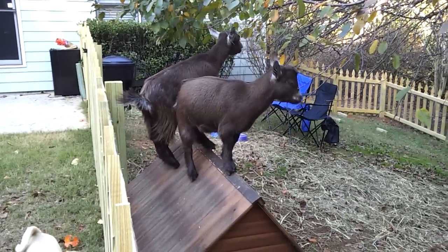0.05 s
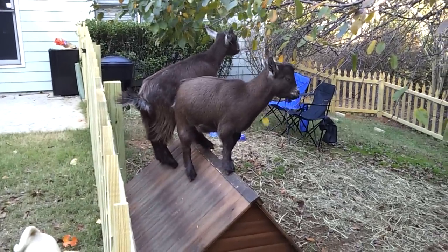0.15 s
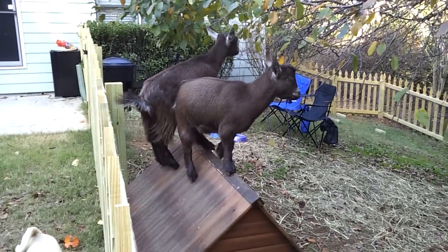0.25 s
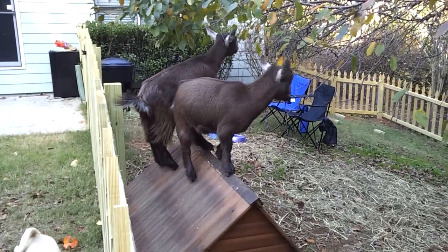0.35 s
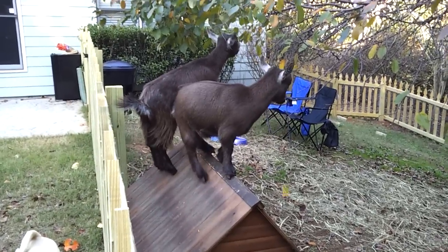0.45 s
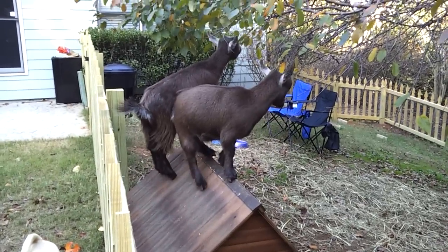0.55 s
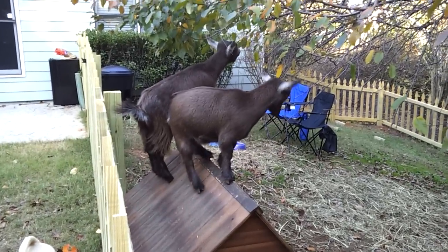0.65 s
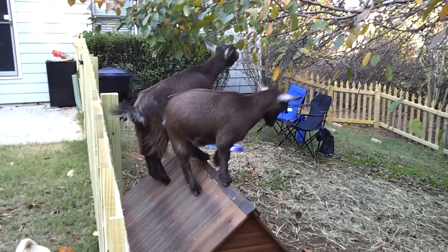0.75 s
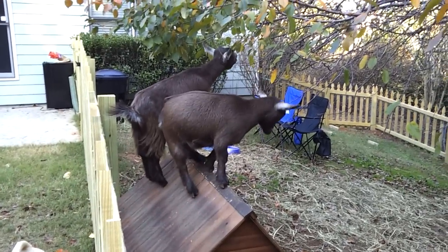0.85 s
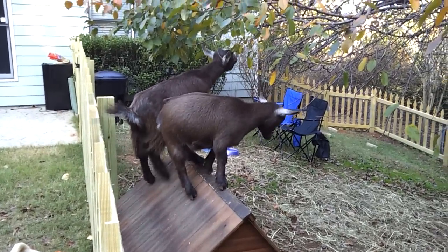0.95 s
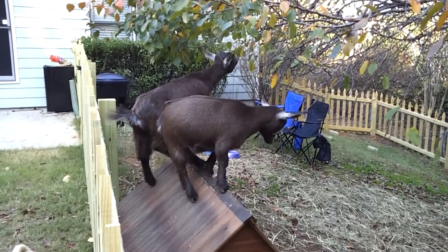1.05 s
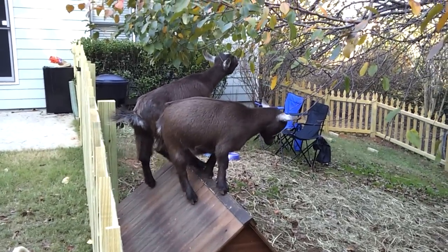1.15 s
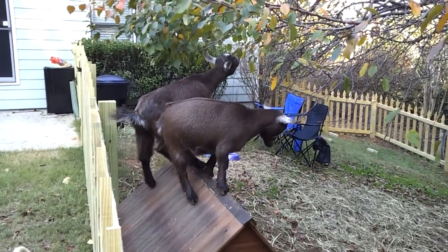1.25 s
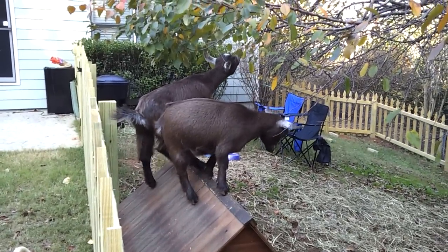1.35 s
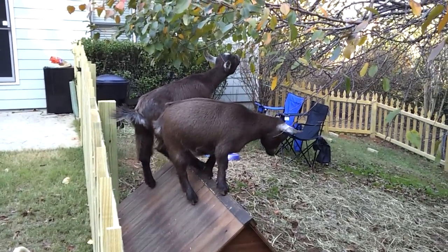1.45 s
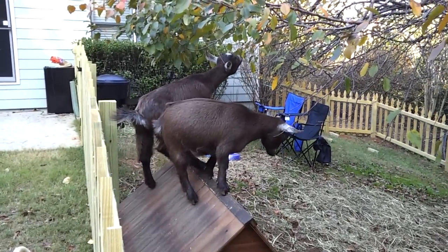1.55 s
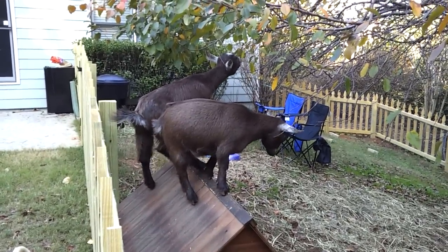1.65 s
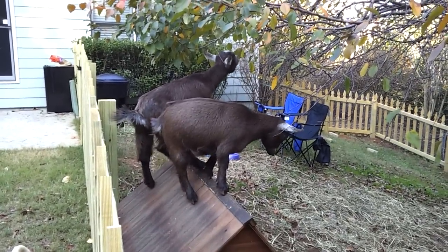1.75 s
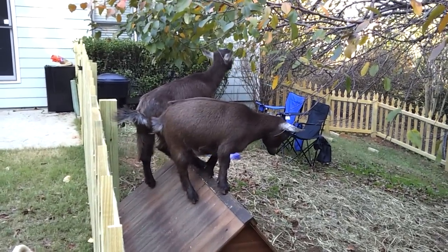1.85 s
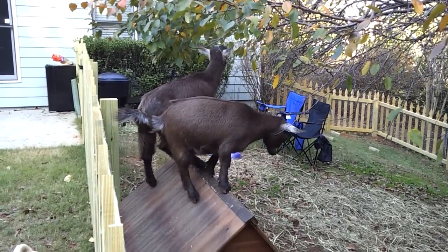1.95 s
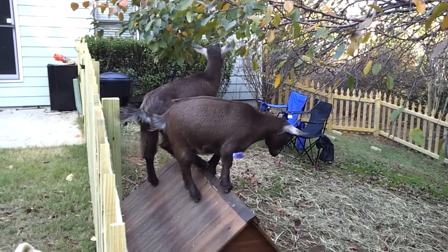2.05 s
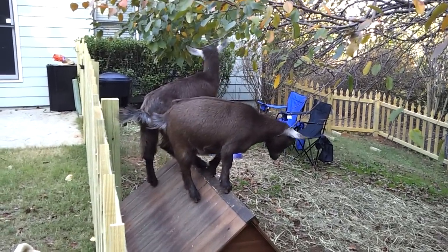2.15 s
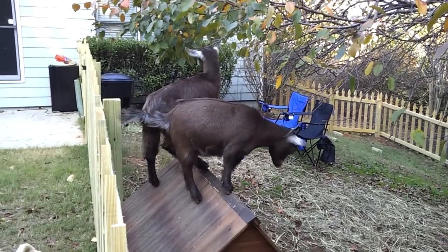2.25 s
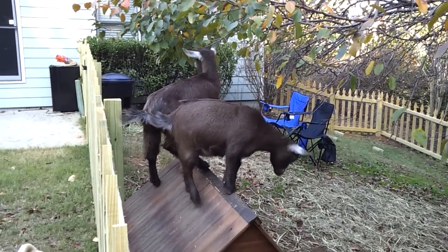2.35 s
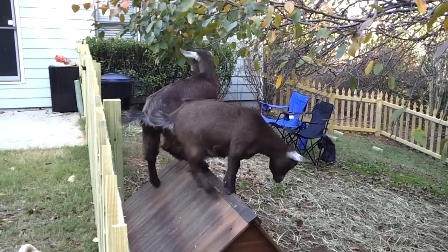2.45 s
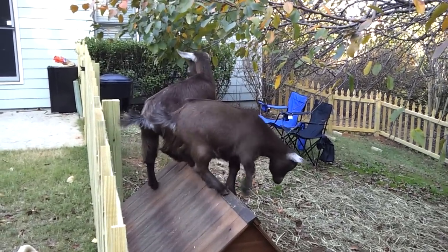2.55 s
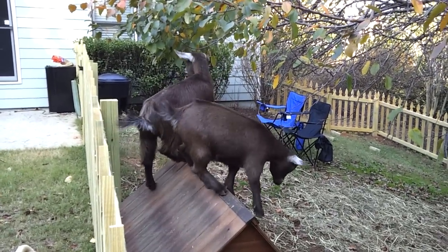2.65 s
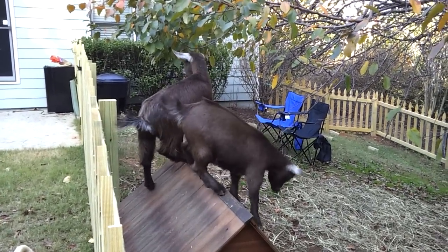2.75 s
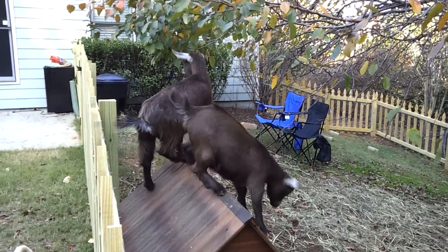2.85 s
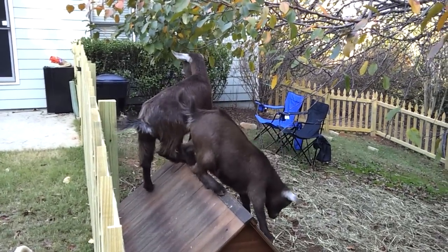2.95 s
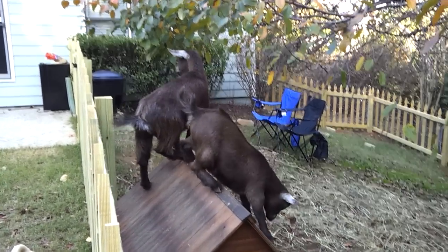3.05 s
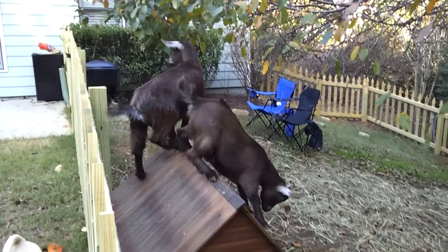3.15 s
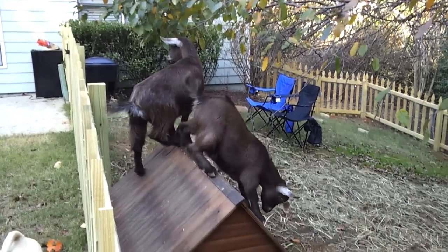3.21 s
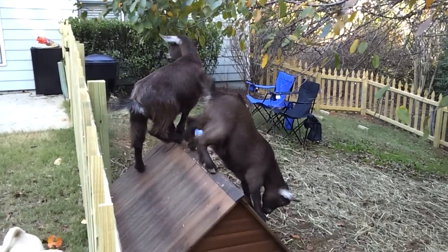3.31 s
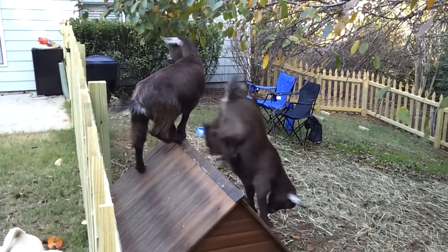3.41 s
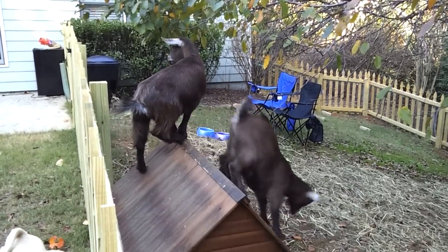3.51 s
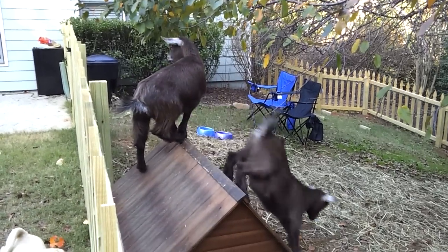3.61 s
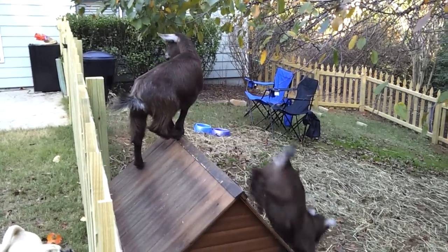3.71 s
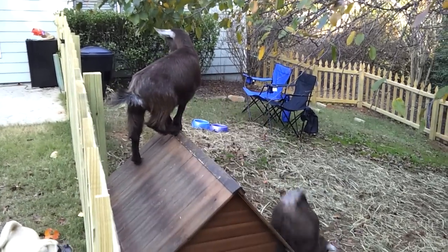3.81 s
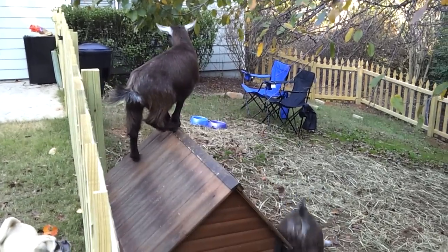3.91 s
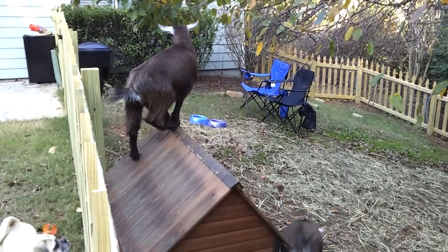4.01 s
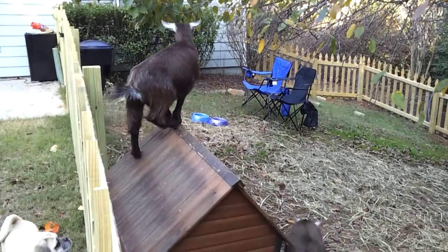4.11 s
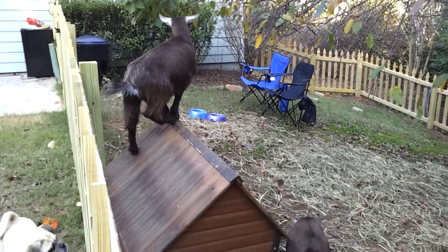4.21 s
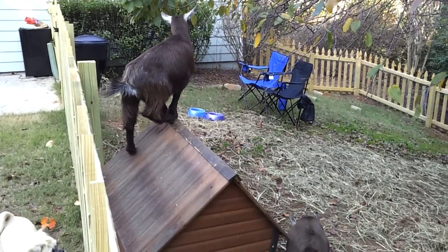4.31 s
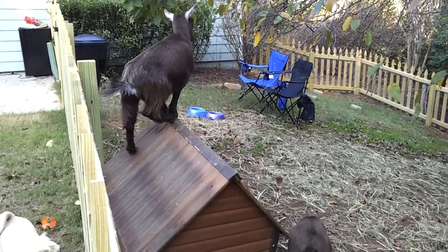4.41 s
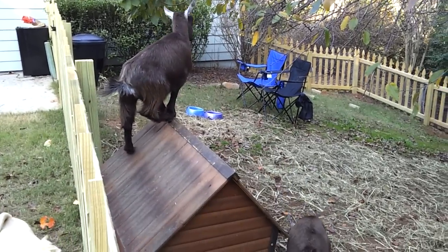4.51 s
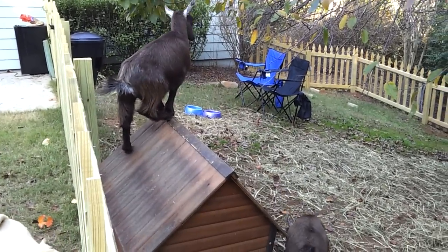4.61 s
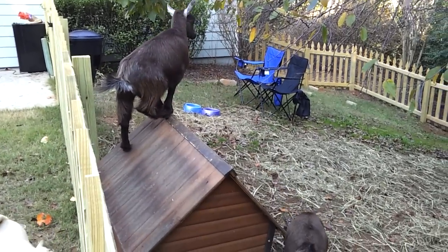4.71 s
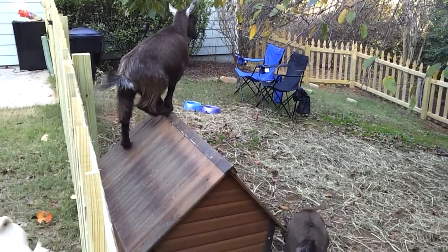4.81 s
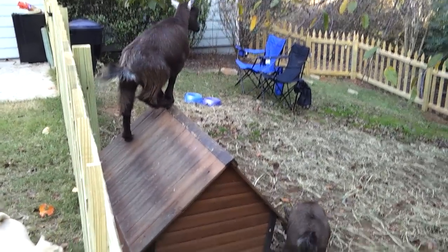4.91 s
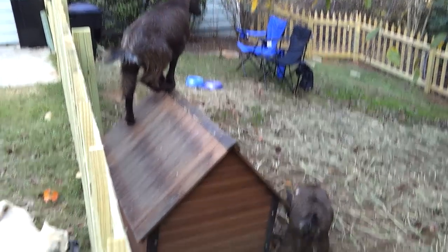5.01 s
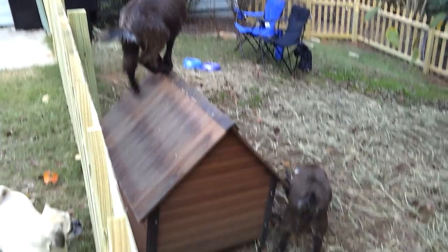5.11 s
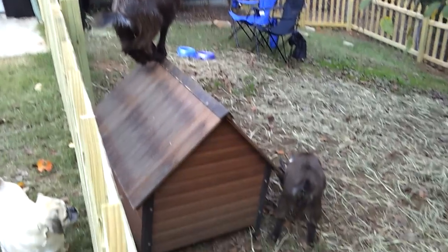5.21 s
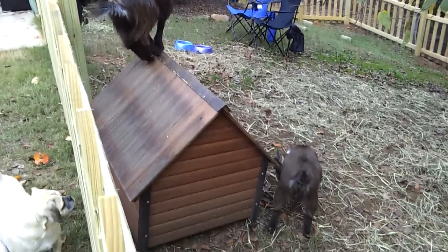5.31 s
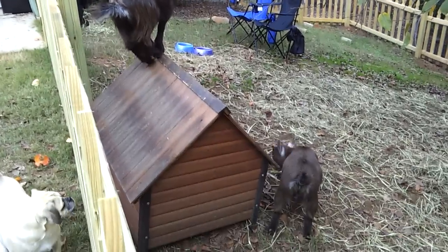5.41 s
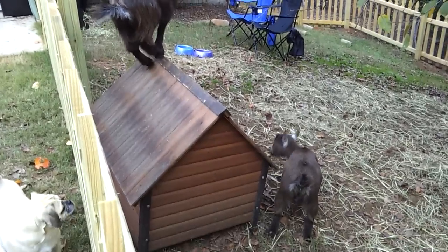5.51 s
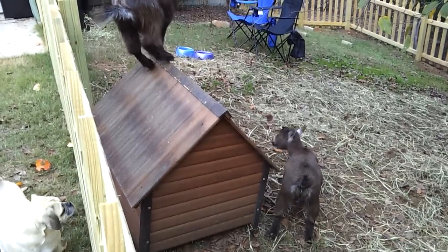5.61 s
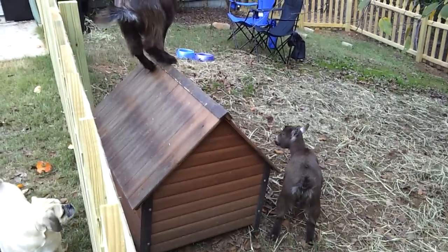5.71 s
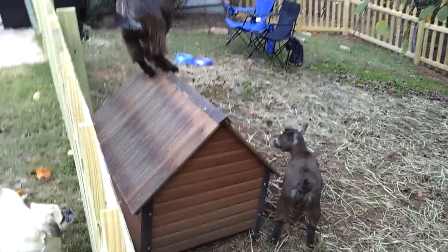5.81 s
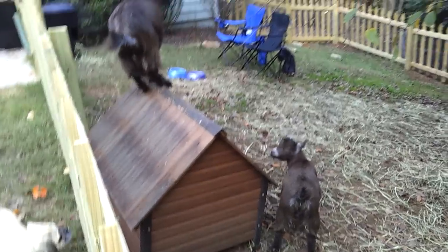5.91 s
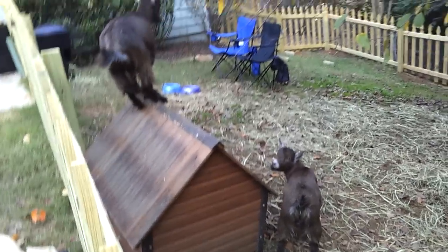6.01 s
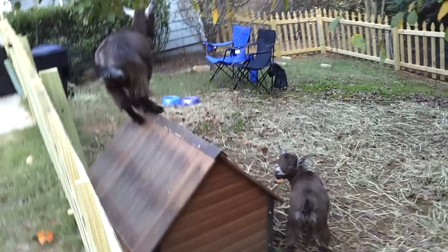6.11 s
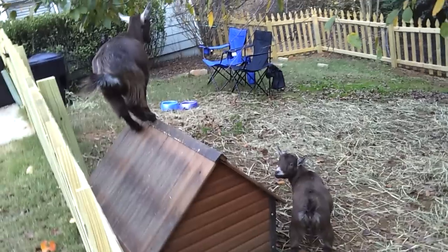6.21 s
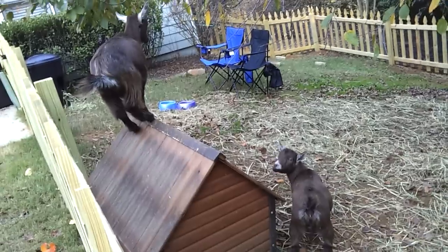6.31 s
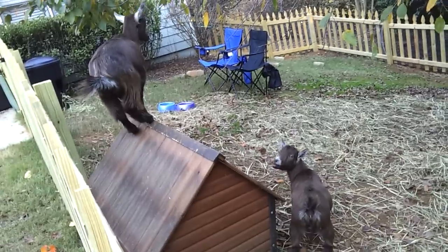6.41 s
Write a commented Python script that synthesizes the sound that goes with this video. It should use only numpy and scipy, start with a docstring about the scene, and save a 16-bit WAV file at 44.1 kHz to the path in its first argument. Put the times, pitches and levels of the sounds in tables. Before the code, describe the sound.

Close to the microphone, goats shift on a wooden doghouse roof with light hoof knocks and scuffs. Midway, a louder knock starts a juddering, rasping slide down the boards, ending in several hollow thumps and a crackle of dry straw. A few faint scuffs and taps follow. Farther off, crickets trill throughout over soft garden air and the low drone of a distant engine.

```python
"""A cricket trills in a garden and, close in front of the microphone, hooves scuff and knock on wood.
Two goats shift about on a doghouse roof; one slides down the boards, kicks off and lands in straw.
Each blow booms the hollow box, knocks the roof boards and cracks on the surface; slipping hooves
judder and rasp. Farther off, crickets sing in the hedges over quiet air and a distant engine's drone."""
import sys
import numpy as np
from scipy import signal
from scipy.fft import rfft, irfft
from scipy.io import wavfile
from scipy.ndimage import uniform_filter1d

SR = 44100
rng = np.random.default_rng(int(sys.argv[2]) if len(sys.argv) > 2 else 0)


def wrap_up_sound(samples):
    """Save the sound to the file named by the first command line argument, as 16-bit audio."""
    columns = np.atleast_2d(samples).T
    # keep every value between -1 and 1, then stretch to whole-number steps
    tamed = np.clip(columns, -1, 1)
    steps = np.round(tamed * 32767).astype(np.int16)
    wavfile.write(sys.argv[1], SR, steps)


N = 284886

# hoof blows: t/s, knock level/dB, thump over knock/dB, hardness/0-1, box pitch the spot favours/Hz
BLOWS = [(.277, -46.5, -8, .9, 110), (.456, -52, 17, 0.7, 106), (.501, -55, 18.5, .05, 124),
         (.537, -51.5, 14.5, 0, 139), (.572, -53, 12, 0.8, 153), (.825, -42.5, 2, 0.6, 130),
         (1.086, -50, -12, 0.8, 141), (1.129, -41.5, -7, 0.93, 109), (2.195, -48.5, -3, 0.76, 135),
         (2.309, -48, 22.5, .25, 99), (2.377, -32.5, 6.5, 0.16, 160), (2.395, -35, 1, 0.2, 130),
         (2.430, -51.5, 18.5, 0.2, 121), (2.541, -45, 5, 0.67, 150), (2.562, -39, -18, .68, 150),
         (2.687, -45.5, 12, 0.2, 154), (2.730, -22.5, 0, 0.2, 210), (2.770, -33, -14, .03, 195),
         (2.842, -45, 9, .03, 110), (2.877, -55.5, 22, .03, 133), (3.527, -28, 10, .25, 108),
         (3.544, -29, 13.5, 0.91, 110), (3.582, -41, 1, .75, 165), (3.771, -41, 8, 0.8, 140),
         (3.786, -30.5, 19, .48, 130), (3.808, -26, 12.5, 0.58, 134), (5.332, -45, 10, 1, 89.5),
         (5.636, -40, -5, 0.62, 167), (5.654, -48, 5.5, .05, 167), (5.787, -48, -12.5, 0.97, 135)]
# modes of the hollow box: f/Hz, level/dB, t60/s
BOX_MODES = [(57.7, 15, 0.32), (69, 11.5, 0.31), (96.7, 10, 0.13), (110.6, 6, 0.25), (135.4, 12, 0.13),
             (153, -5.5, 0.29), (172.3, 2, 0.17), (197.3, 2, 0.22)]
# modes of the roof boards: f/Hz, level/dB, t60/s
BOARD_MODES = [(240.4, -10.5, 0.14), (291.7, 5.5, 0.055), (317, 4.5, 0.06), (353.5, 0, 0.096),
               (384, -14, 0.17), (424.5, 5.5, 0.039), (465, 1.5, 0.066), (522.6, -0.5, 0.081),
               (573, -6, 0.056)]
# bright ringing of single planks: f/Hz, level/dB, t60/s
PLANK_MODES = [(950, -3, 0.095), (1157, 0, 0.042), (1291, 3, 0.067), (1401, -0.5, 0.059), (1543, 3, 0.043),
               (2320, 0, 0.035), (2374, 5, 0.028), (2597, 6, 0.036), (2870, -1.5, 0.025)]
# dense upper modes of the planks: f/Hz, level/dB
CRACK_SPECTRUM = [(450, 14.5), (600, 1), (780, 2.5), (950, 10), (1100, 6), (1400, -24), (1700, 9),
                  (2050, -10.5), (2400, -2), (2950, 6), (3400, -5), (6000, -7.5), (12000, 2.5)]
# the long slide down the roof, stalling and then gathering speed: t/s, judder level/dB, rasp level/dB
SLIDE = [(2.73, -58, -49), (2.97, -46, -52), (3.07, -48, -59), (3.5, -40, -49), (3.61, -46, -49.5),
         (3.68, -45.5, -67), (3.8, -41, -47)]
# horn rubbing on wood: f/Hz, level/dB
RASP_SPECTRUM = [(400, -2), (750, -11), (930, 0.5), (1100, -11), (1400, 6), (1950, -1), (2400, 1.5),
                 (3200, -0.5), (4700, -4), (5600, -9), (6800, -5), (10200, -10.5), (12000, -15)]
# short scuffs of a hoof: t/s, length/s, level/dB
SCUFFS = [(.13, 0.18, -58), (.43, 0.24, -52), (.76, 0.091, -50.5), (1.22, 0.056, -51.5), (1.38, 0.053, -56),
          (3.27, 0.041, -48.5), (4.29, 0.15, -53.5), (4.97, 0.25, -54), (6.21, 0.1, -49.5)]
# a hoof scuffing across the grain: f/Hz, level/dB
SCUFF_SPECTRUM = [(300, 1), (600, -5.5), (1100, -10), (1600, -4), (2100, -4.5), (2600, -1.5), (3300, -16),
                  (5000, -13.5), (7000, -17), (12000, -43)]
# hollow scrapes at the eaves: t/s, length/s, level/dB
EAVE_SCRAPES = [(3.40, 0.084, -48), (3.47, 0.24, -49), (3.55, 0.15, -54), (3.66, 0.13, -47)]
# rustles in the straw: t/s, length/s, level/dB
RUSTLES = [(.5, 0.1, -57), (2.52, 0.079, -53), (3.773, 0.048, -42.5), (3.92, 0.039, -54),
           (3.98, 0.11, -45.5), (4.012, 0.099, -40.5), (4.14, 0.042, -53.5), (4.248, 0.03, -49.5),
           (4.99, 0.078, -54), (5.86, 0.15, -58)]
# dry straw: f/Hz, level/dB
STRAW_SPECTRUM = [(800, -9), (2200, -8.5), (3200, -3.5), (5500, -4), (6700, 2), (7500, 4), (8600, -1),
                  (9900, 3.5), (11000, -3.5), (12000, -3.5)]
# snapping stalks and grit: t/s, level/dB, brightest f/Hz
SNAPS = [(1.804, -54, 8300), (1.902, -58, 8000), (1.948, -53.5, 7540), (2.317, -46, 3600),
         (2.634, -55, 5560), (3.355, -44, 3800), (3.409, -50, 3170), (3.788, -40.5, 7220),
         (3.818, -43.5, 3500), (4.276, -51, 4886)]
# each cricket's voice, by name: f/Hz, level/dB, wing stroke rate/Hz, trill length/s
CRICKET_VOICES = {"near": (3855, -48.5, 34, .41), "shrill": (4070, -55.5, 33, .38),
                  "slow": (3977, -58.5, 26, .46), "long": (3787, -55.5, 33, .6),
                  "middle": (3640, -55.5, 31.5, .52), "low": (3530, -57.5, 31, .45),
                  "lowest": (3326, -57.5, 30, .47)}
# starts of each cricket's trills, by name: t/s
TRILL_STARTS = {"near": [-.04, 2.725], "shrill": [.8, 3.56, 5.69], "slow": [.57, 1.24, 4.4], "long": [-.3,
                1.42, 3.16, 4.98, 5.72], "middle": [.72, 4.55, 5.58], "low": [.69, 2.24, 4.03], "lowest":
                [1.72, 5.55]}
# the far chorus in the hedges: t/s, level/dB
CHORUS = [(0, -52), (.45, -63), (1.1, -56.5), (4.2, -58.5), (6.46, -55.5)]
# the distant engine: t/s, firing rate/Hz, level/dB
ENGINE = [(0, 74.4, -50.5), (2.2, 73.1, -53.5), (2.6, 57.8, -50.5), (3.1, 56.48, -47), (4.5, 55.23, -48.5),
          (5.55, 55.03, -45), (5.85, 53, -52.5), (6.46, 50.4, -46.5)]
# garden air: f/Hz, relative level/dB
AIR_SPECTRUM = [(20, -9), (45, 1), (80, -3), (130, -12), (250, -13.5), (500, -18.5), (900, -23),
                (1900, -23.5), (3000, -26.5), (5000, -29), (8000, -29.5), (12000, -30.5)]


def hoof_blows(push_s=0.004, flex_s=0.0045):
    """Close up: the box swells under the goat's weight, the boards knock, the hard horn cracks on top."""
    out, t = np.zeros(N), np.arange(SR // 3) / SR
    for s, knock_db, weight_db, hardness, box_hz in BLOWS:
        # a harder contact favours higher board modes and cracks louder and brighter
        board_hz = 260 * (536 / 260) ** hardness
        crack_db = -16 + 17.5 * hardness
        cut_hz = 1400 * (2600 / 1400) ** hardness
        thump = ring(BOX_MODES, t, favour(BOX_MODES, box_hz, reach_octaves=0.42))
        thump *= 1 - np.exp(-t / push_s)
        knock = ring(BOARD_MODES, t, favour(BOARD_MODES, board_hz, reach_octaves=0.61), scatter_db=3)
        knock *= 1 - np.exp(-t / flex_s)
        crack_decay = fade(t, t60=0.047) + undb(-23) * fade(t, t60=0.67)
        crack = colour(rng.standard_normal(len(t)) * crack_decay, CRACK_SPECTRUM)
        planks = ring(PLANK_MODES, t, rng.choice([-1, 1], len(PLANK_MODES)), scatter_db=3)
        crack = cut(burst(crack) + undb(-7) * burst(planks), "low", cut_hz)
        blow = undb(weight_db) * burst(thump) + burst(knock) + undb(crack_db) * burst(crack)
        add(out, s, undb(knock_db) * blow)
    # so small a box radiates little deep bass
    return cut(out, "high", hz=50)


def slipping(skid_judder_db=-26, skid_rasp_db=-40.5):
    """Hooves catch and let go on the roof: coarse slips shake the wood, fine ones rasp and ring planks."""
    now, t = np.arange(N) / SR, np.arange(SR // 3) / SR
    signs = (-1) ** np.arange(len(BOARD_MODES))
    boards = ring(BOARD_MODES, t, signs * favour(BOARD_MODES, hz=320, reach_octaves=0.56))
    box = ring(BOX_MODES, t, favour(BOX_MODES, hz=170, reach_octaves=0.5))
    judder = shake(grains(per_s=200, spread_db=3), burst(box) + burst(boards))
    grip = grains(per_s=2500, spread_db=3) * undb(2.9 * walk(60))
    planks = shake(grip, ring(PLANK_MODES, t))
    rasp = unit(colour(grip, RASP_SPECTRUM)) + undb(-6) * planks
    scuffs = unit(colour(grip, SCUFF_SPECTRUM)) * rub_envelope(SCUFFS)
    scrape = colour(grains(per_s=2900, spread_db=7), RASP_SPECTRUM)
    eaves = unit(flutter(scrape, spacing_hz=467, bounce=0.75)) * rub_envelope(EAVE_SCRAPES)
    judder_db, rasp_db = curves(SLIDE)
    sliding = (now > SLIDE[0][0]) & (now < SLIDE[-1][0])
    slide = sliding * (judder * undb(judder_db) + rasp * undb(rasp_db))
    skid = skid_envelope() * (judder * undb(skid_judder_db) + rasp * undb(skid_rasp_db))
    return slide + skid + scuffs + eaves


def skid_envelope(full_thump_db=-13.5, rise_s=0.021):
    """A hoof skids briefly after each blow, 2 dB more for each dB of thump."""
    power, t = np.zeros(N), np.arange(SR // 3) / SR
    shape = np.minimum(t / rise_s, fade(t - rise_s, t60=0.19))
    for s, knock_db, weight_db, *_ in BLOWS:
        skid_db = 2 * (knock_db + weight_db - full_thump_db)
        add(power, s, (shape * undb(skid_db)) ** 2)
    return np.sqrt(power)


def straw():
    """By the doghouse, dry stalks crackle under the hooves; now and then one snaps."""
    crackle = colour(grains(per_s=3500, spread_db=5), STRAW_SPECTRUM)
    out = unit(crackle) * rub_envelope(RUSTLES)
    t = np.arange(SR // 16) / SR
    for s, db, hz in SNAPS:
        click = rng.standard_normal(len(t)) * (fade(t, t60=.004) + 0.27 * fade(t, t60=0.048))
        spectrum = [(hz / 6, -18), (hz / 2, -7), (hz, 0), (hz * 2, -13)]
        add(out, s, undb(db) * burst(colour(click, spectrum)))
    return out


def trill(length_s, hz, stroke_hz, sag=.035, arch=.042, duty=.74, warm_up_s=.05, swell_s=0.004):
    """Each wing stroke sounds a tone whose pitch arches and sags with the speed of the wing."""
    t = np.arange(int(length_s * SR)) / SR
    stroke, phase = (t * stroke_hz).astype(int), t * stroke_hz % 1
    detune, accent = rng.standard_normal((512, 2))[stroke].T
    along = np.minimum(phase / duty, 1)
    speed = np.abs(np.sin(np.pi * along))
    # the teeth of the wing's file catch unevenly
    teeth = unit(uniform_filter1d(rng.standard_normal(len(t)), size=90))
    pitch = hz * (1 + sag * (.5 - along) + arch * (speed - .85) + .004 * detune + 0.00778 * teeth)
    # the trill starts flat and climbs as the wings gather speed
    pitch *= 1 - 0.0159 * np.exp(-t / warm_up_s)
    force = speed ** 0.81 * undb(0.97 * accent) * (1 - np.exp(-t / swell_s))
    return unit(force * np.sin(2 * np.pi * np.cumsum(pitch) / SR))


def crickets(echo_db=-58):
    """Single crickets in the hedges; all echo about equally loud, so the faint, far ones blur most."""
    out = np.zeros(N)
    for name, (hz, db, stroke_hz, length_s) in CRICKET_VOICES.items():
        blur_db = echo_db - db
        whole_strokes_s = round(length_s * stroke_hz) / stroke_hz
        for start in TRILL_STARTS[name]:
            song = np.pad(trill(whole_strokes_s, hz, stroke_hz), (0, SR // 4))
            blurred = garden_echo(song, blur_db, t60=0.32) / np.hypot(1, undb(blur_db))
            add(out, start, undb(db) * blurred)
    return out


def cricket_chorus(count=13, centre_hz=3700, spread=0.093):
    """Far off, unbroken trills blur together, loudest at the middle pitches."""
    chorus = np.zeros(N)
    for offset in np.linspace(-1, 1, count):
        song = trill(N / SR + 1, centre_hz * (1 + spread * offset), stroke_hz=rng.uniform(29, 35))
        chorus += song[:N] * undb(walk(2.034) - 14 * offset ** 2)
    return unit(garden_echo(chorus, wet_db=-1.5, t60=0.29)) * undb(curves(CHORUS)[0])


def engine(octave_db=-12):
    """In the distance an engine drones at its firing rate, then drops to a lower note."""
    hz, db = curves(ENGINE)
    phase = 2 * np.pi * np.cumsum(hz * (1 + 0.0046 * walk(8.8))) / SR
    return unit(np.sin(phase) + undb(octave_db) * np.sin(2 * phase)) * undb(db + walk(2))


def air(level_db=-48.5):
    """All round the microphone, a soft outdoor hush wavers a little."""
    hush = rng.standard_normal(N) * undb(.5 * walk(4.9))
    return undb(level_db) * unit(colour(hush, AIR_SPECTRUM))


def garden_echo(x, wet_db, t60):
    """The direct sound plus scattered echoes from fence, wall and leaves."""
    t = np.arange(SR // 2) / SR
    tail = rng.standard_normal(len(t)) * fade(t, t60) * (1 - np.exp(-t / 0.02))
    tail /= np.sqrt(np.sum(tail ** 2))
    return x + undb(wet_db) * signal.fftconvolve(x, tail)[:len(x)]


def flutter(x, spacing_hz, bounce):
    """Quick echoes between two close boards ring at every multiple of spacing_hz."""
    lag = np.exp(-2j * np.pi * np.fft.rfftfreq(2 * N, 1 / SR) / spacing_hz)
    return irfft(rfft(x, 2 * N) / (1 - bounce * lag))[:N]


def ring(modes, t, weights=1, scatter_db=1):
    """Decaying modes, their levels a little different at each blow."""
    hz, db, t60 = np.transpose(modes)
    gain = weights * undb(db + scatter_db * rng.standard_normal(len(hz)))
    return gain @ (np.sin(2 * np.pi * hz[:, None] * t) * fade(t, t60[:, None]))


def favour(modes, hz, reach_octaves):
    """Each spot on the roof drives the modes near one pitch best."""
    return 1 / (1 + (np.log2(np.transpose(modes)[0] / hz) / reach_octaves) ** 2)


def shake(slips, response):
    """Every slip sets the wood ringing; scaled to rms 1."""
    return unit(signal.fftconvolve(slips, response)[:N])


def rub_envelope(rubs, rise=0.13):
    """Short rubs swell quickly and die away."""
    t = np.arange(N) / SR
    return sum(undb(db) * np.interp(t, [s, s + rise * length, s + 0.98 * length], [0, 1.3, 0])
               for s, length, db in rubs)


def grains(per_s, spread_db):
    """Random clicks of uneven strength."""
    clicks = (rng.random(N) < per_s / SR) * rng.choice([-1, 1], N)
    strength = undb(spread_db * np.minimum(rng.standard_normal(N), 2))
    return unit(clicks * strength + 1e-9)


def walk(per_s):
    """A random drift of rms 1 that turns per_s times a second."""
    step = int(SR / per_s)
    held = np.repeat(rng.standard_normal(N // step + 1), step)
    return unit(uniform_filter1d(held, step)[:N])


def colour(x, spectrum, size=4096):
    """Causal filter through (f/Hz, level/dB) points, built from the cepstrum."""
    hz, db = np.transpose(spectrum)
    log_hz = np.log(np.fft.rfftfreq(size, 1 / SR) + 1)
    gain = undb(np.interp(log_hz, np.log(hz), db))
    cepstrum = irfft(np.log(gain))
    cepstrum[1:size // 2] *= 2
    cepstrum[size // 2 + 1:] = 0
    return signal.fftconvolve(x, irfft(np.exp(rfft(cepstrum))))[:len(x)]


def cut(x, keep, hz):
    """Second-order filter that keeps the "low" or "high" side of hz."""
    return signal.sosfilt(signal.butter(2, hz, keep, fs=SR, output="sos"), x)


def fade(t, t60):
    """Exponential decay, 60 dB down at t60."""
    return np.exp(-np.log(1000) * t / t60)


def curves(table):
    """The columns of a table as controls over time."""
    s, *columns = np.transpose(table)
    return [np.interp(np.arange(N) / SR, s, column) for column in columns]


def add(out, s, x):
    """Mix a sound in at time s."""
    i = int(s * SR)
    x, i = x[max(-i, 0):], max(i, 0)
    out[i:i + len(x)] += x[:max(N - i, 0)]


def undb(db):
    """Decibels to gain."""
    return 10 ** (np.asarray(db) / 20)


def unit(x):
    """Scale to rms 1."""
    return x / np.sqrt(np.mean(x ** 2))


def burst(x):
    """Scale a short sound to the energy of 20 ms at rms 1."""
    return x / np.sqrt(np.sum(x ** 2) / (.02 * SR))


def scene():
    """One microphone: goats close in front, the garden behind."""
    knocks = garden_echo(hoof_blows(), wet_db=-16, t60=.3)
    rubs = garden_echo(slipping() + straw(), wet_db=-13, t60=0.26)
    return (knocks + rubs + crickets() + cricket_chorus() + engine() + air())[None]


def record(dry):
    """The microphone loses the deepest bass and the top."""
    top_hz = 11800
    lowpass = signal.ellip(12, .1, 80, top_hz, fs=SR, output="sos")
    return signal.sosfilt(lowpass, cut(dry, "high", hz=22))


dry = scene()
out = record(dry)
wrap_up_sound(out)
```